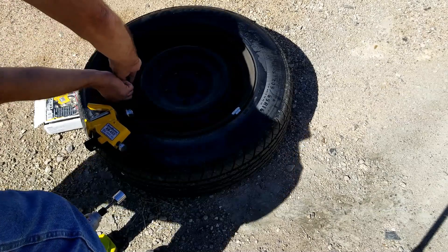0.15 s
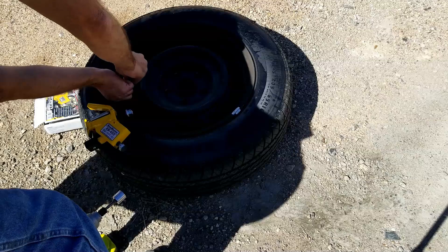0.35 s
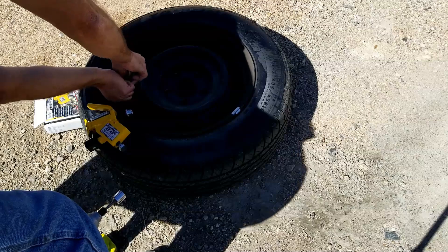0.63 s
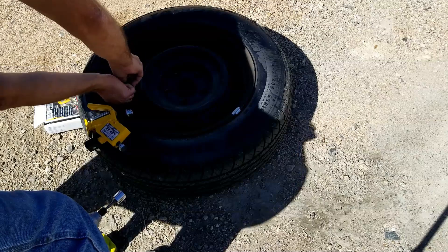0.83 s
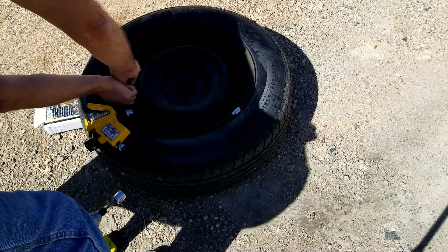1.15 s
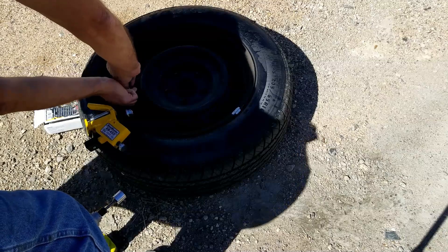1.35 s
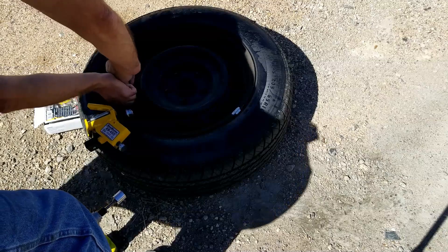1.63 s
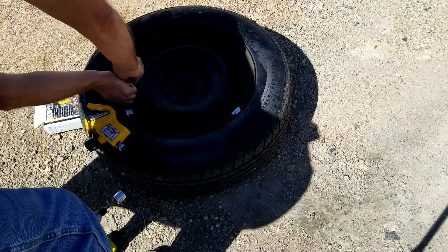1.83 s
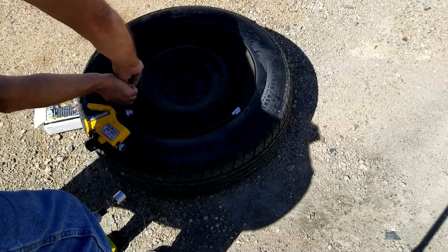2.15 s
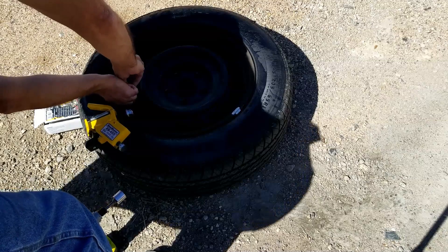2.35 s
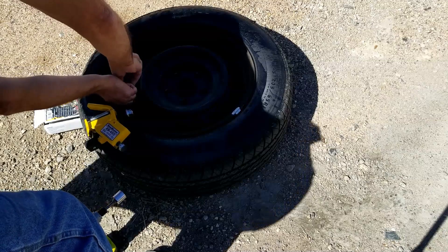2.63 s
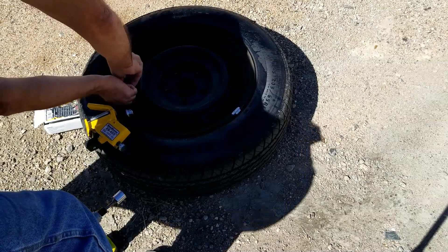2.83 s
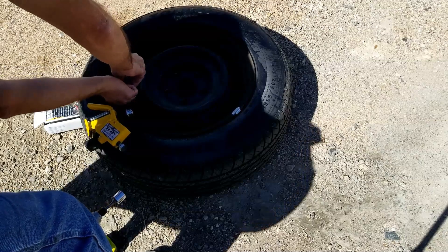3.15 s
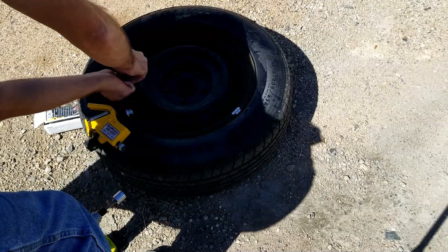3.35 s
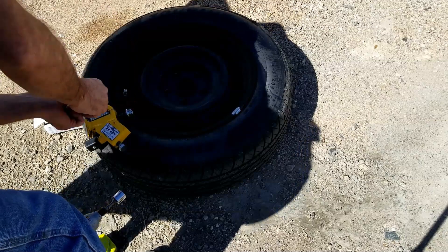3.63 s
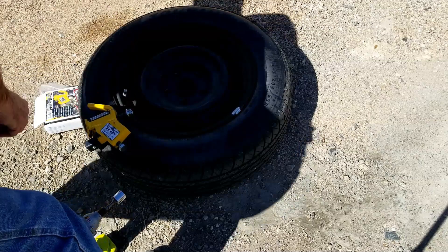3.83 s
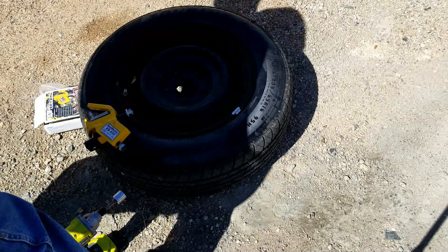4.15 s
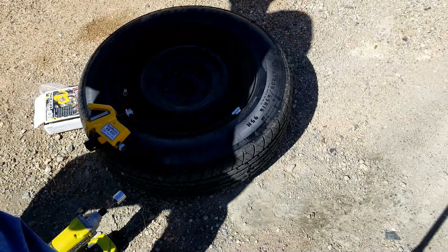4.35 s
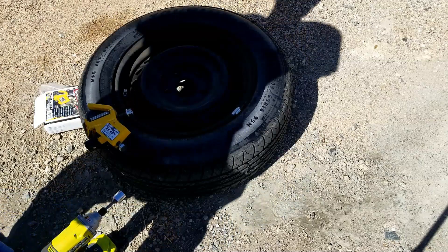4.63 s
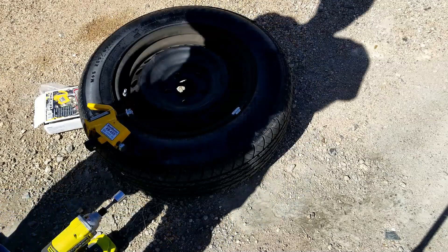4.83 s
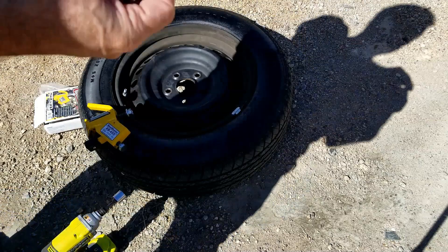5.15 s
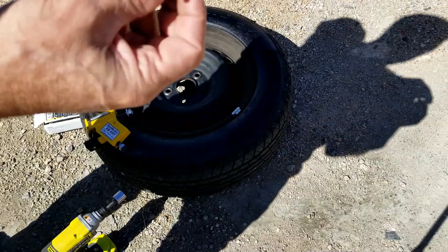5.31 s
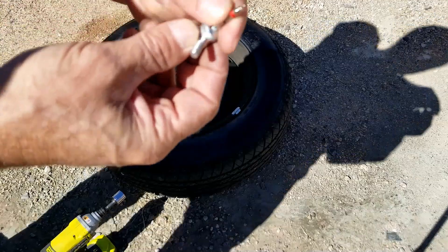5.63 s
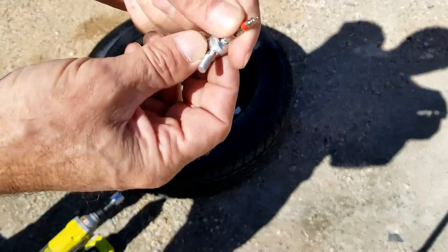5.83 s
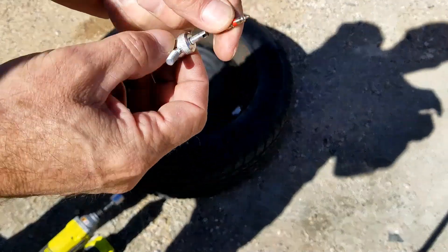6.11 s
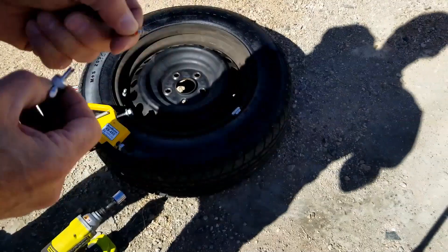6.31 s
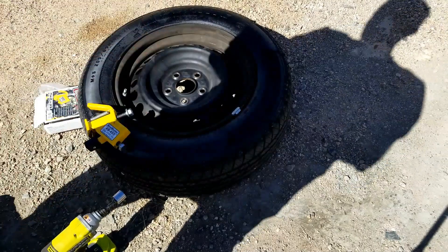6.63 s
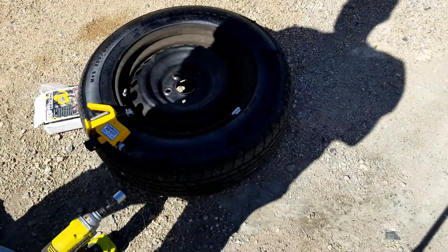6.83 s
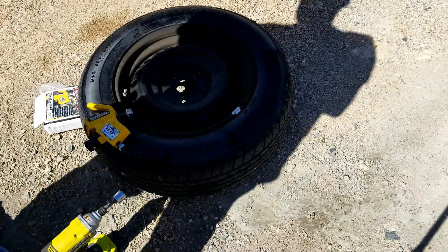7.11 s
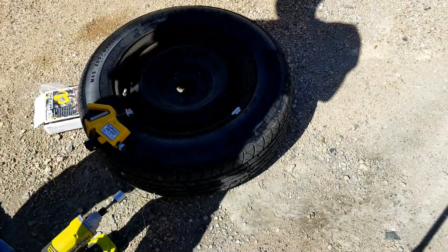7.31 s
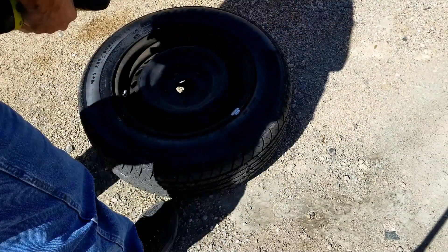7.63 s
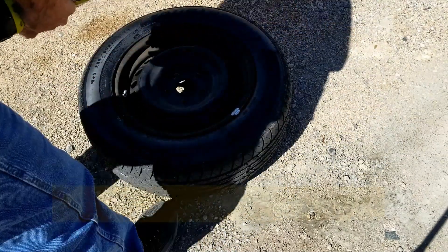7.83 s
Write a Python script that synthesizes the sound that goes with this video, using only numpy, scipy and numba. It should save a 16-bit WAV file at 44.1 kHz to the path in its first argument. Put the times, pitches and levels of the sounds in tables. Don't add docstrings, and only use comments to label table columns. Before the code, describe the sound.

A thin, bright hiss sputters from a tyre valve as fingers twist its core, swelling and briefly squealing. The core comes out with a falling whoosh and the air jets strongly and steadily. A hand dulls it for a moment, a clear whistle grows, then an abrupt cut leaves a weaker hiss, clicks and stronger wind. Outdoors, close single microphone with rumbling wind.

```python
import sys
import numpy as np
from scipy import signal
from scipy.fft import rfft, irfft
from scipy.io import wavfile
from scipy.ndimage import uniform_filter1d
from numba import njit

SR = 44100
rng = np.random.default_rng(int(sys.argv[2]) if len(sys.argv) > 2 else 0)


def boost(x):
    u = np.asarray(x, float) / 20
    return 10 ** u


def master_out(mix):
    frames = np.transpose(np.atleast_2d(mix))
    ceiling = np.clip(frames, -1, 1)
    pcm = np.round(ceiling * 32767).astype(np.int16)
    wavfile.write(sys.argv[1], SR, pcm)


N = 351477

# t/s, change of flow/dB, length/s
FLOW_CHANGES = [(.02, 1, 0.027), (.74, 2.5, 0.029), (.77, -5, .03), (1.055, -11, 0.14), (1.14, 3, 0.043),
                (1.225, -13.5, 0.077), (1.32, -6.5, 0.055), (1.39, 3.5, .07), (1.48, -1.5, .06),
                (1.55, 2, 0.046), (1.68, -3.5, 0.032), (1.735, -3, 0.029), (1.885, -5.5, .03),
                (2.97, 6.5, .05), (3.11, -4, 0.045), (3.84, 0.5, 0.094), (4.39, -3, 0.099),
                (4.72, -2, 0.043), (4.93, -0.5, 0.073), (5.17, -4.5, 0.053), (6.24, -1.5, .08)]
FRAME = dict(window="cosine", nperseg=2048, noverlap=1024)


def leak():
    # t/s, flow/dB, jet speed as extra treble/dB, stem mode f/Hz, top mode f/Hz
    leak_path = [
        (0, -36.5, 12.5, 8040, 14700),
        (.55, -37, 16, 6550, 14100),
        (.78, -38, 10.5, 8160, 14500),
        (1.0, -43.5, 8.5, 7760, 14300),
        (1.65, -39, 12.5, 7440, 14840),
        (1.95, -31, 12, 7450, 14900),
        (2.35, -27.5, 14, 7640, 14420),
        (2.75, -32.5, 16.5, 8030, 14000),
        (3.45, -36, 12.5, 8300, 14400),
    ]
    # t/s, change of treble/dB, length/s
    twist_spurts = [
        (.16, 5.5, .07),
        (.3, 5.5, .06),
        (.42, 3.5, .06),
        (.54, 4, .1),
        (1.62, 2, 0.076),
        (1.81, 7.5, .12),
        (2.97, -5.5, .06),
        (3.075, 4.5, 0.027),
        (3.17, 2.5, .06),
        (3.3, -2.5, .25),
    ]
    # t/s, stem left free to ring/dB, hollow of the palms/dB
    hand_grip = [
        (0, -1, -2),
        (.7, 1, 0),
        (.9, 2, 0.5),
        (1.5, 0, 0.5),
        (2.05, 1.5, 1),
        (2.6, -3, 0),
        (2.85, 0, 2.5),
        (3.3, 0, 1),
    ]
    # f/Hz, level per Hz/dB
    leak_tilt = [(290, -48), (500, -14), (1150, -11.5), (1410, -6), (1540, -5.5), (2370, -13.5),
                 (3930, -16.5), (6510, -10), (9340, -9), (13800, 11.5), (15700, 10.5)]
    # f/Hz, width/Hz, level/dB
    leak_modes = [(1790, 240, 9.5), (5840, 230, 0), (6630, 790, 3.5), (13340, 790, 0.5), (15880, 660, 5.5)]
    # f/Hz, width/Hz, level against the jet top/dB, from t/s, to t/s
    deep_modes = [(5580, 300, -17, 0.12, .76), (6490, 370, -14, .12, 0.91), (13700, 900, -7, .28, .7),
                  (5400, 350, -11, 1.47, 1.72), (6770, 750, -17, 2.0, 2.3), (8200, 1100, -3.5, 2.95, 3.0)]

    flow, speed, stem_hz, top_hz = curves(leak_path)
    flow = flow + moves(FLOW_CHANGES)
    speed = speed + moves(twist_spurts)
    free, hollow = curves(hand_grip)
    palms = hollow - 35 + .8 * (flow + 36)
    stem = flow + free + 8 + .25 * speed - 2 * (stem_hz / 1000 - 7.5)
    top = flow + speed
    levels = [palms, flow - .5, stem - 3, top - 3]
    noise = colour(leak_tilt, leak_modes)
    air = turbulent(noise, [650, 2400, 4900, 10200, 18000], levels, surge_db=1.26, flicker_db=0.95)
    air = stem_modes(air, stem_hz, top_hz, (1800., .8), (2200., .8))
    for hz, width, db, t0, t1 in deep_modes:
        singing = ring(np.full(N, 1. * hz), 1. * width)
        air = air + boost(top + db) * singing * gate(t0, t1, 0.25 * (t1 - t0), 0.032)
    return fingers(air, patchy_db=1.93, size=(30, 5))


def open_stem():
    # t/s, flow/dB, how strongly the stem mode rings/dB, stem mode f/Hz
    open_flow = [
        (3.4, -28.5, -2, 8000),
        (3.9, -27, -2.5, 8200),
        (3.97, -29, 0.5, 8060),
        (5.1, -30, -1, 7770),
        (5.3, -29, -4, 7500),
        (6.1, -28.5, -9.5, 6870),
        (6.42, -27, -0.5, 7780),
        (6.9, -27, 1.5, 7740),
        (7.5, -26, 1, 8300),
    ]
    # t/s, top mode f/Hz, shadow on the middle treble/dB
    held_fingers = [
        (5.17, 14700, 0),
        (5.25, 12400, -0.5),
        (5.45, 11800, 1),
        (5.62, 12400, 1),
        (5.7, 13400, -9),
        (6.1, 14000, -12),
        (6.3, 14800, -1),
    ]
    # f/Hz, level per Hz/dB
    open_tilt = [(290, -48), (500, -20.5), (1070, -21), (1540, -19.5), (2550, -16.5), (3990, -17.5),
                 (5020, -14.5), (6800, -18), (7860, -10.5), (10800, -17), (14200, -7.5), (15700, -7.5)]
    jet_top_hz = 14950

    flow, ring_db, stem_hz = curves(open_flow)
    near_hz, shadow = curves(held_fingers)
    top_hz = np.where(np.arange(N) / SR < held_fingers[0][0], jet_top_hz, near_hz)
    hands = gate(0, 3.92, .01, .06)
    rim = -10.5 + 2.5 * hands
    flank = -9 + shadow + 7.5 * hands
    air = jet(open_tilt, 1.3, flow + moves(FLOW_CHANGES), rim, flank, 3, stem_hz, top_hz, ring_db)
    dull = np.clip(.12 * (jet_top_hz - top_hz) / 1000, 0, .8)
    return shaded(air - dull * svf(air, np.full(N, 14400.), 2000.))


def late_jet():
    # f/Hz, level per Hz/dB
    late_tilt = [(600, -14), (1100, -12), (2000, -11), (3000, -19), (4300, -26), (6300, -25), (7500, -8),
                 (10100, -13), (10800, -24), (11900, -11), (12800, -16), (14300, -9), (15700, -11)]
    return jet(late_tilt, .1, flow_db=-40, rim_db=-4.5, flank_db=-6.5, top_db=3, stem_hz=7700, top_hz=13100)


def jet(tilt, top_gain, flow_db, rim_db, flank_db, top_db, stem_hz, top_hz, ring_db=0):
    # f/Hz, width/Hz, level/dB
    jet_modes = [(1754, 660, 5.5), (2630, 380, 3.5), (12110, 930, 6), (15680, 900, 4)]
    rim, stem = flow_db + rim_db + 2.5, flow_db + ring_db - 5
    flank, top = flow_db + flank_db - 1.5, flow_db + top_db - 4
    noise = colour(tilt, jet_modes)
    air = turbulent(noise, [650, 6500, 9100, 11300, 18000], [rim, stem, flank, top], surge_db=0.26, flicker_db=1.13)
    air = stem_modes(air, stem_hz + np.zeros(N), top_hz + np.zeros(N), (900., 1.2), (2300., top_gain))
    return fingers(air, patchy_db=1.06, size=(36, 7))


def stem_modes(x, stem_hz, top_hz, stem, top):
    x = x + stem[1] * svf(x, stem_hz, stem[0])
    return x + top[1] * svf(x, top_hz, top[0])


def fingers(x, patchy_db, size):
    z = signal.stft(x, SR, **FRAME)[2]
    patches = uniform_filter1d(rng.standard_normal(z.shape), size[0], axis=0)
    patches = uniform_filter1d(patches, size[1], axis=1)
    return signal.istft(z * boost(patchy_db * patches / patches.std()), SR, **FRAME)[1][:N]


def shaded(x):
    # t/s, cancelled f/Hz, depth 0-1
    hand_echo = [
        (4.4, 3700, .3),
        (5.0, 4000, .3),
        (5.3, 5300, .55),
        (5.6, 5850, .62),
        (6.0, 6150, .68),
        (6.3, 6200, .4),
        (6.4, 4000, .5),
        (7.4, 4100, .6),
    ]
    hz, depth = curves(hand_echo)
    return x - np.clip(depth, 0, 1) * gate(4.4, 7.5, .5, .01) * svf(x, hz, 2500.)


def edge_tones():
    # t/s, pitch f/Hz, level/dB, octave level/dB
    cup_tone = [
        (2.7, 1834, -34, -60),
        (2.75, 1583, -25, -50),
        (2.834, 1472, -20, -44),
        (2.87, 1748, -20, -40),
        (2.9, 1500, -29.5, -46),
        (2.908, 1650, -36, -55),
        (2.92, 1680, -30, -60),
    ]
    core_squeal = [
        (2.985, 5000, -40, -42),
        (3.005, 5450, -19, -29),
        (3.03, 5780, -17, -27),
        (3.055, 6300, -27, -22),
        (3.075, 6750, -24, -18),
        (3.088, 7000, -32, -32),
    ]
    stem_whistle = [
        (7.04, 5830, -39, -60),
        (7.12, 5840, -26, -52),
        (7.22, 5865, -21, -45),
        (7.32, 5890, -18.5, -37),
        (7.41, 5900, -15.5, -34),
        (7.43, 5900, -18, -33),
        (7.485, 5925, -13, -33),
        (7.506, 5935, -16, -36),
    ]
    tones = edge_tone(cup_tone, waver_db=2.5, waver_hz=15.2, fade=.03, blur=41.0, blur_db=-34)
    tones = tones + edge_tone(core_squeal, waver_db=3, waver_hz=80, fade=.015, blur=320., blur_db=-24)
    return tones + edge_tone(stem_whistle, waver_db=2, waver_hz=14, fade=.002, blur=170., blur_db=-24)


def edge_tone(table, waver_db, waver_hz, fade, blur, blur_db):
    hz, *levels = curves(table)
    phase = 2 * np.pi * np.cumsum(hz + waver_hz * walk(150)) / SR
    tone = 0
    for harmonic, db in enumerate(levels, start=1):
        noisy = boost(db) / np.sqrt(1 + boost(db - blur_db) ** 2)
        locked = np.sqrt(2 * (boost(db) ** 2 - noisy ** 2)) * boost(waver_db * walk(60))
        tone = tone + locked * np.sin(harmonic * phase)
        tone = tone + noisy * ring(harmonic * hz, harmonic * blur)
    return tone * gate(table[0][0], table[-1][0], 0.042, fade)


def pull():
    # t/s, f/Hz, level/dB
    falling_hollow = [
        (3.19, 1650, -42),
        (3.24, 1550, -30.5),
        (3.3, 1500, -28.5),
        (3.35, 1100, -29),
        (3.4, 700, -37),
        (3.45, 450, -44),
        (3.47, 400, -60),
    ]
    hz, db = curves(falling_hollow)
    return boost(db) * ring(hz, 900.) * gate(falling_hollow[0][0], falling_hollow[-1][0], 0.023, 0.018)


def ground_and_tools():
    # t/s, peak level/dB, ring f/Hz, time to fall by 60 dB/s
    gravel_ticks = [
        (4.616, -29, 918, 0.013),
        (4.914, -25, 910, .012),
        (4.991, -25, 1400, .012),
        (5.004, -22.5, 1400, .012),
        (6.346, -22, 1400, .012),
        (6.77, -29, 900, .012),
        (7.4715, -16.5, 1200, .012),
    ]
    rim_clicks = [
        (7.5065, -26, 4000, .01),
        (7.538, -30, 3600, .012),
        (7.568, -35.5, 4300, .4),
        (7.8038, -18.5, 3700, .025),
        (7.8075, -23, 2500, .02),
        (7.839, -31, 3000, .04),
        (7.85, -27, 4800, .01),
    ]
    return ticks(gravel_ticks, spread=.75) + ticks(rim_clicks, spread=0.69)


def ticks(events, spread):
    out, t = np.zeros(N), np.arange(4096) / SR
    grits = rng.standard_normal((len(events), 4096))
    for (s, db, hz, t60), grit in zip(events, grits):
        grit[0] = 4.0
        knock = grit * np.exp(-np.log(1000) * t / max(t60, .003))
        for _ in range(2):
            knock = svf(knock, hz + 0 * t, spread * hz)
        i = int(s * SR)
        out[i:i + 4096] += boost(db) * knock / np.abs(knock).max()
    return out


def wind():
    # t/s, rumble level/dB, flutter level/dB
    steady_breeze = [
        (0, -22.5, -35),
        (1.6, -25, -37.5),
        (1.75, -34, -37.5),
        (3.4, -36, -40),
        (4.4, -41.5, -43.5),
        (5.3, -35, -38.5),
        (7.49, -34, -38),
        (7.515, -25, -31),
    ]
    # t/s, peak level/dB, length/s
    gusts = [(0.197, -21.5, 0.15), (0.628, -20.5, 0.073), (1.0, -23, .1), (1.625, -23.5, 0.041),
             (1.92, -23.5, 0.039), (2.06, -29, 0.13), (2.225, -25, 0.059), (2.71, -28.5, 0.24),
             (3.044, -27.5, 0.05), (3.137, -22.5, 0.049), (3.258, -22.5, 0.075), (3.563, -24, .12),
             (3.824, -26.5, 0.07), (4.018, -26, 0.09), (4.2, -25.5, 0.11), (4.657, -22.5, 0.097),
             (5.033, -24, 0.094), (5.252, -24, 0.043), (5.424, -22.5, 0.1), (5.553, -26.5, 0.053),
             (5.71, -23, 0.065), (5.882, -27, 0.16), (6.15, -20, 0.046), (6.467, -24.5, 0.19),
             (6.73, -23.5, 0.071), (7.063, -20.5, 0.074), (7.29, -23, 0.18), (7.577, -14.5, 0.067),
             (7.753, -14.5, 0.073), (7.955, -16, .1)]
    # f/Hz, level per Hz/dB
    wind_tilt = [(11, -47), (18, -16), (27, -31), (50, -1.5), (70, -1), (92, 1), (135, -9), (163, -17.5),
                 (197, -14), (226, -19), (378, -21.5), (668, -30), (1100, -23.5), (1430, -56), (2420, -120)]

    breeze, flutter = curves(steady_breeze)
    power = boost(breeze) ** 2
    for (_, peak_db, _), bump in zip(gusts, bumps(gusts, sharp=1.96)):
        power = power + boost(peak_db) ** 2 * bump
    rumble = 10 * np.log10(power)
    flutter = flutter + 0.13 * (rumble - breeze)
    noise = colour(wind_tilt, [(65, 21, 3.8)])
    return turbulent(noise, [12, 145, 720], [rumble, flutter], surge_db=1.48, flicker_db=1.5)


def turbulent(noise, edges_hz, levels_db, surge_db, flicker_db):
    surge = surge_db * walk(14)
    air = 0
    for lo, hi, db in zip(edges_hz, edges_hz[1:], levels_db):
        air = air + boost(db + surge + flicker_db * walk(20)) * part(noise, lo, hi)
    return air


def colour(tilt, modes=()):
    hz = np.maximum(np.arange(N // 2 + 1) * SR / N, 1)
    tilt_hz, tilt_db = np.transpose(tilt)
    db = np.interp(np.log(hz), np.log(tilt_hz), tilt_db)
    for f, width, peak_db in modes:
        db = db + peak_db / (1 + (2 * (hz - f) / width) ** 2)
    return hz, boost(db) * rfft(rng.standard_normal(N))


def part(noise, lo_hz, hi_hz, soft=0.086):
    hz, spectrum = noise
    above_lo = .5 + .5 * np.tanh(np.log(hz / lo_hz) / soft)
    above_hi = .5 + .5 * np.tanh(np.log(hz / hi_hz) / soft)
    x = irfft(spectrum * np.sqrt(above_lo * (1 - above_hi)), N)
    return x / np.std(x)


def ring(hz, width):
    x = svf(svf(rng.standard_normal(N), hz, width), hz, width)
    return x / np.std(x)


@njit
def svf(x, hz, width):
    out, band, low = np.empty(len(x)), 0., 0.
    for i in range(len(x)):
        g, k = np.tan(np.pi * hz[i] / SR), width / hz[i]
        v = (band + g * (x[i] - low)) / (1 + g * (g + k))
        band, low, out[i] = 2 * v - band, low + 2 * g * v, k * v
    return out


def curves(table):
    s, *columns = np.transpose(table)
    return [np.interp(np.arange(N) / SR, s, c) for c in columns]


def gate(t0, t1, fade0, fade1):
    t = np.arange(N) / SR
    return np.clip((t - t0) / fade0 + .5, 0, 1) * np.clip((t1 - t) / fade1 + .5, 0, 1)


def walk(rate):
    k = int(SR / rate)
    held = np.repeat(rng.standard_normal(N // k + 1), k)
    return 0.98 * uniform_filter1d(uniform_filter1d(held, k), k)[:N]


def bumps(events, sharp):
    t = np.arange(N) / SR
    return [np.exp(-np.abs(2 * (t - s) / max(length, .01)) ** sharp) for s, _, length in events]


def moves(events):
    return sum(e[1] * b for e, b in zip(events, bumps(events, sharp=4)))


def scene():
    core_out_s, change_s = 3.33, 7.507
    air = leak() * np.sqrt(gate(-1, core_out_s, .01, .24))
    air = air + open_stem() * np.sqrt(gate(core_out_s, change_s, .24, .002))
    air = air + late_jet() * gate(change_s, 9, .002, .01)
    mono = air + edge_tones() + pull() + ground_and_tools() + wind()
    return np.array([mono, mono])


def thinned(x):
    top_hz = 15750
    hz, _, z = signal.stft(x, SR, **FRAME)
    treble = (hz > 6500) & (hz < top_hz)
    hiss = np.sqrt((np.abs(z[treble]) ** 2).mean(axis=0))
    mask_db = np.interp(hz, [200, 800, 3500, 7000, 10000], [-30, -9, -9, -9, -16])
    scatter = rng.standard_normal((129, z.shape[1]))
    scatter = np.repeat(scatter, 8, axis=0)[:len(hz)]
    step = hiss * (hiss / hiss.mean()) ** .3 * boost(mask_db[:, None] + 4 * scatter) + 1e-12
    size = np.floor(np.abs(z) / step + 0.43) * step
    z = size * np.exp(1j * np.angle(z)) * (hz < top_hz)[:, None]
    return signal.istft(z, SR, **FRAME)[1][:N]


def band_limit(x):
    return signal.sosfilt(signal.butter(12, 17090, fs=SR, output="sos"), x)


def record(dry):
    mono = thinned(np.tanh(.6 * dry[0]) / .6)
    return band_limit(np.array([mono, mono]))


dry = scene()
out = record(dry)
master_out(out)
```